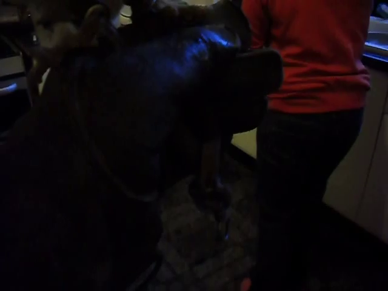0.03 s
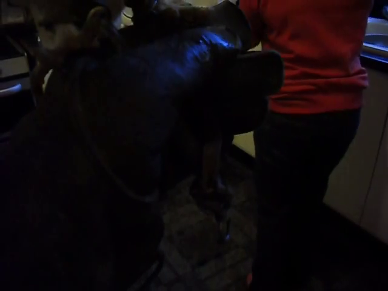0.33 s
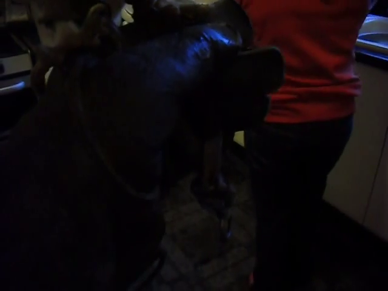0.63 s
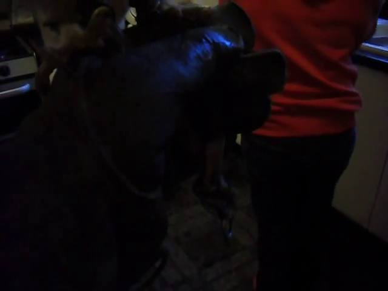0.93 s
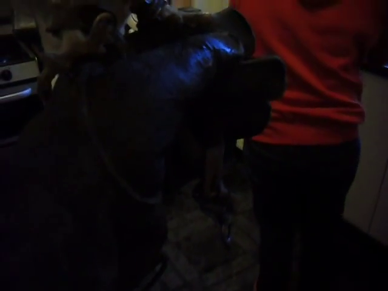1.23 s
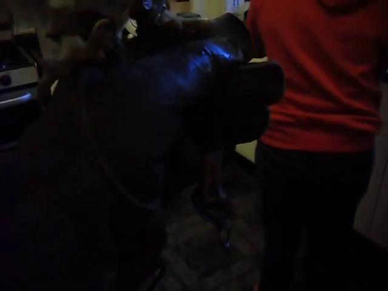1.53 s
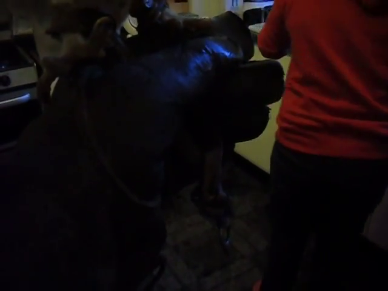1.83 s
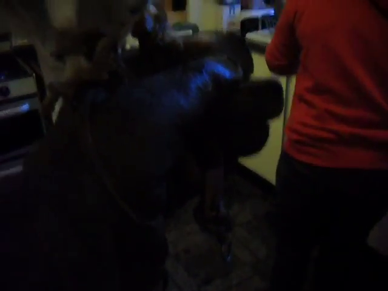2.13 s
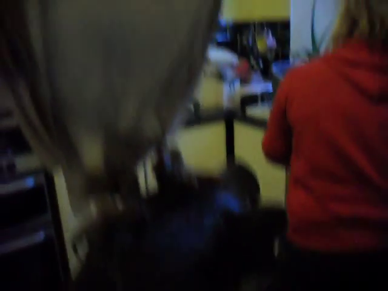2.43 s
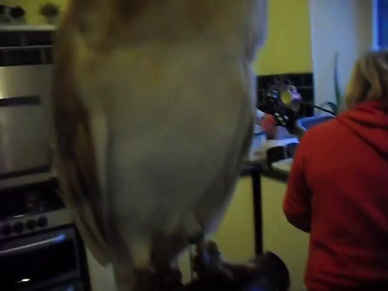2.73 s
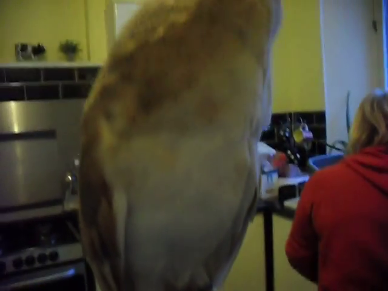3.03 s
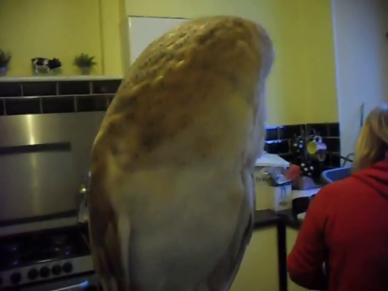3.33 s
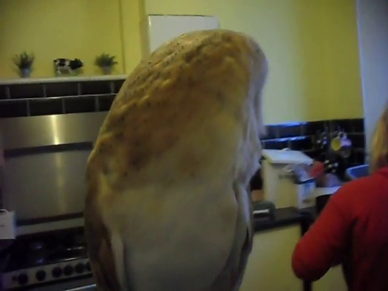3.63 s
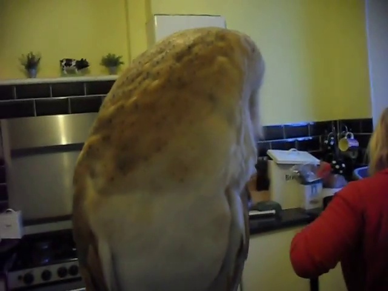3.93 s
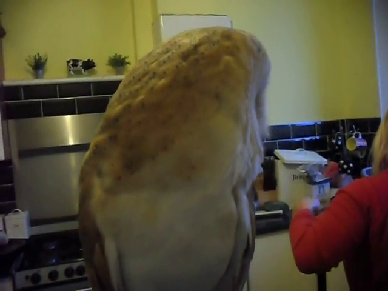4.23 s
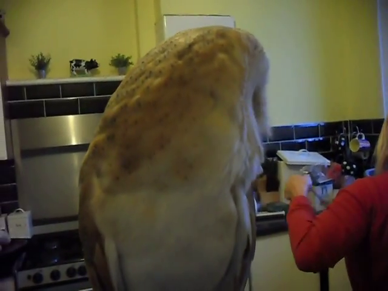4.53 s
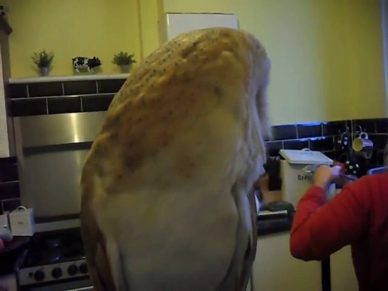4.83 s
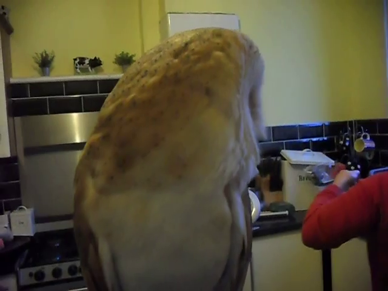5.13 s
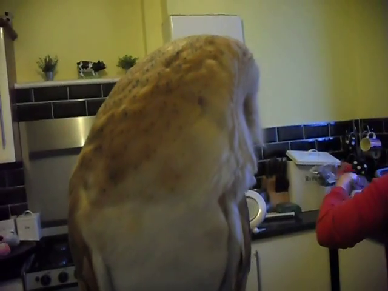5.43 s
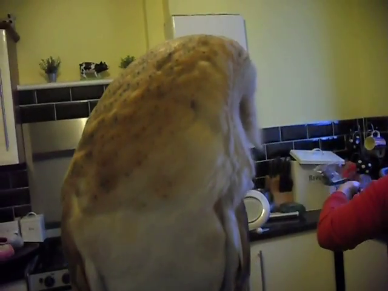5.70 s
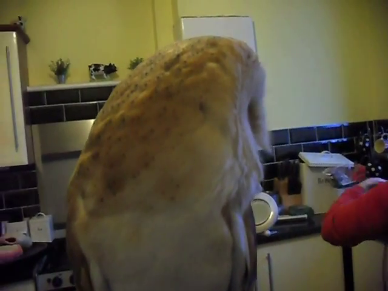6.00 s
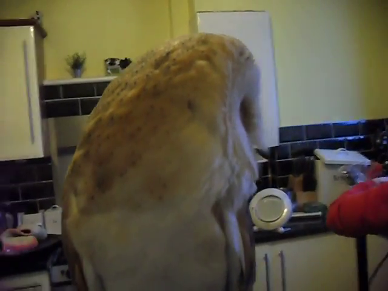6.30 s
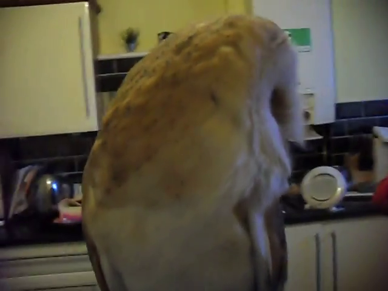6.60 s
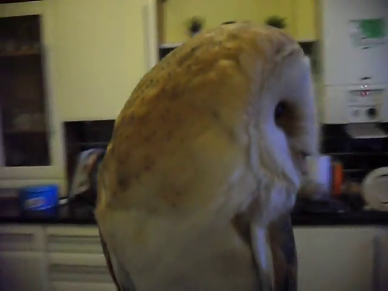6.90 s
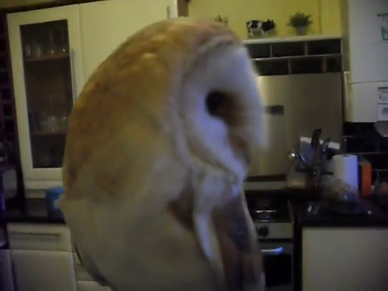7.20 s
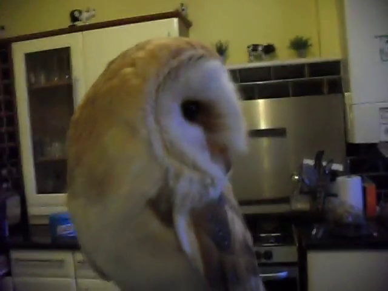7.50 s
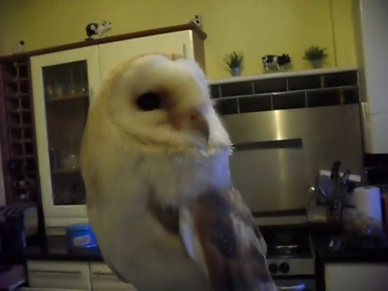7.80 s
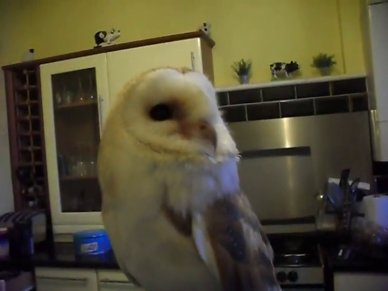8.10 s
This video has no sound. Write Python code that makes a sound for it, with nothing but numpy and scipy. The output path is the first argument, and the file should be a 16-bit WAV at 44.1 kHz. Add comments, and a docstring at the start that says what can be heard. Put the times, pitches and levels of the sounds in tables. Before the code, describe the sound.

A low hum and steady hiss fill a quiet kitchen, with faint brushing of sleeves and feathers. A soft knock at the counter is followed by one sharp, close click. Then a barn owl near the microphone gives a pair of short, squeaky chirps with tiny pips, and does so again a moment later. A few more dull knocks follow. The chirps and knocks ring briefly in the tiled room.

```python
"""A low hum and steady hiss fill a quiet kitchen. Sleeves and feathers brush, and someone knocks
softly at the counter now and then. At 2.1 s a hard contact gives one sharp, close click.
Near 4 s and again near 5.6 s a barn owl close by gives a pair of squeaky chirps among short pips
and squeaks: its syrinx slides and breaks in pitch, and its windpipe and beak colour the voice.
The soft work goes on to the end. Owl and chores ring briefly in the tiled room."""
import sys
import numpy as np
from scipy import signal
from scipy.fft import rfft, irfft, next_fast_len
from scipy.io import wavfile
from scipy.ndimage import uniform_filter1d

SR = 44100
rng = np.random.default_rng(int(sys.argv[2]) if len(sys.argv) > 2 else 0)


def master_out(mix):
    """Clip the mix to full scale and print it as 16-bit PCM to the path in sys.argv[1]."""
    frames = np.transpose(np.atleast_2d(mix))
    ceiling = np.clip(frames, -1, 1)
    pcm = np.round(ceiling * 32767).astype(np.int16)
    wavfile.write(sys.argv[1], SR, pcm)


N = 359415
T = np.arange(N) / SR


def undb(db):
    """Decibels to gain."""
    return 10 ** (np.asarray(db) / 20)


def unit_rms(x):
    """Scale to rms 1."""
    return x / np.sqrt(np.mean(x ** 2) + 1e-18)


def add(out, time_s, x):
    """Mix x into out from time_s."""
    i = int(time_s * SR)
    out[i:i + len(x)] += x[:len(out) - i]


def decay(t, t60_s):
    """Exponential fall, 60 dB in t60_s."""
    return undb(-60 * t / t60_s)


def resonance(f, centre_hz, width_hz):
    """Gain of one resonance at frequencies f."""
    return 1 / np.sqrt(1 + ((f ** 2 - centre_hz ** 2) / (f * width_hz + 1e-9)) ** 2)


def colour(f, points):
    """Gain of a (frequency [Hz], level [dB]) curve at frequencies f."""
    hz, db = np.transpose(points)
    return undb(np.interp(np.log(f + 1e-9), np.log(hz), db))


def noise(size, gain):
    """Noise of rms 1 with spectrum gain(f)."""
    n_fft = next_fast_len(size)
    f = np.arange(n_fft // 2 + 1) * SR / n_fft
    spectrum = rfft(rng.standard_normal(n_fft)) * gain(f)
    return unit_rms(irfft(spectrum, n_fft)[:size])


def waver(size, hz):
    """Random motion of rms 1, up to about hz."""
    return noise(size, lambda f: 1 / (1 + (f / hz) ** 4))


# hum tones: (frequency [Hz], level [dB])
HUM_TONES = [(30.3, -55.5), (60, -65.5)]

def hum(drift_rad=0.416, drift_hz=4.2, flutter=0.17, flutter_hz=19.0):
    """Low tones, slightly unsteady in phase and level."""
    tones = np.zeros(N)
    for hz, db in HUM_TONES:
        phase = 2 * np.pi * hz * T + drift_rad * waver(N, drift_hz)
        tones += undb(db) * np.sqrt(2) * np.sin(phase)
    return tones * (1 + flutter * waver(N, flutter_hz))


# hiss spectrum: (frequency [Hz], relative density [dB])
HISS_SPECTRUM = [(12, -10.5), (20, 1), (38, -6.5), (55, -9.5), (75, -11.5), (196, -17), (269, -17.5),
                 (307, -18.5), (390, -20), (470, -22), (551, -22.5), (1250, -26.5), (2080, -28.5),
                 (9930, -34.5), (11300, -36), (14700, -79), (22000, -120)]

def hiss(level_db=-53.5):
    """Steady broadband noise, strongest in the bass."""
    return undb(level_db) * noise(N, lambda f: colour(f, HISS_SPECTRUM))


# brush strokes: (centre time [s], length [s], level [dB], centre [Hz], width [Hz])
BRUSH_STROKES = [(0.35, 0.118, -60, 388, 150), (1.091, 0.48, -59, 416, 294), (2.333, 0.574, -62, 786, 1200),
                 (3.579, 0.98, -62.5, 1480, 2420), (7.203, 1.35, -63, 1700, 3600),
                 (7.5, 1.3, -70.5, 1560, 450)]

def brushing(grain_db=0.5, grain_hz=45):
    """Sleeves and feathers rub: soft, grainy swells of band noise."""
    out = np.zeros(N)
    for centre_s, length_s, db, centre_hz, width_hz in BRUSH_STROKES:
        size = int(length_s * SR)
        friction = noise(size, lambda f: resonance(f, centre_hz, width_hz) ** 2)
        grain = undb(grain_db * waver(size, grain_hz))
        stroke = unit_rms(friction * grain) * np.hanning(size)
        add(out, max(centre_s - length_s / 2, 0), undb(db) * stroke)
    return out


# counter knocks: (time [s], level [dB], low-pass cutoff [Hz])
COUNTER_KNOCKS = [(1.492, -43.5, 1350), (3.736, -46, 1410), (5.277, -48, 1400), (5.306, -47.5, 1400),
                  (5.392, -54.5, 2000), (6.285, -50.5, 1200), (6.383, -49.5, 1100), (6.603, -50, 1400),
                  (6.873, -49, 3420), (6.934, -49, 1500), (7.751, -50.5, 1710)]

def knocks(highpass_hz=150, attack_s=0.00257, t60_s=0.0694):
    """Soft impacts at the counter: dull, fast-decaying noise bursts."""
    out, t = np.zeros(N), T[:SR // 3]
    envelope = np.minimum(t / attack_s, 1) * decay(t, t60_s)
    for time_s, db, top_hz in COUNTER_KNOCKS:
        thud = noise(len(t), lambda f: f / np.hypot(f, highpass_hz) / (1 + (f / top_hz) ** 7))
        add(out, time_s, undb(db) * thud * envelope)
    return out


# modes rung by the click: (frequency [Hz], level [dB], t60 [s])
CONTACT_MODES = [(748, -17.5, 0.0167), (1014, -30, 0.0894), (1125, -28, 0.047), (1805, -47.5, 0.069),
                 (1930, -19.5, 0.0165), (2179, -21.5, 0.0151), (2665, -28.5, 0.0107), (3230, -26, 0.0105),
                 (4380, -29, 0.0051), (6490, -26.5, 0.0079), (7950, -39.5, 0.011)]

def click(time_s=2.1393, push_db=-8.5, pulse_s=0.001238, rebound=0.84,
          crack_db=-25, crack_t60_s=0.0079, crack_hz=2500):
    """A close, hard contact: one push and rebound, a crack and a short ring."""
    out, t = np.zeros(N), T[:SR // 5]
    pulse = -np.sin(2 * np.pi * t / pulse_s) * (t < pulse_s)
    pulse[t >= pulse_s / 2] *= rebound
    ring = sum(undb(db) * decay(t, t60_s) * np.sin(2 * np.pi * hz * t)
               for hz, db, t60_s in CONTACT_MODES)
    crack = noise(len(t), lambda f: 1 / np.hypot(1, f / crack_hz)) * decay(t, crack_t60_s)
    add(out, time_s, undb(push_db) * pulse)
    add(out, time_s + pulse_s / 2, ring + undb(crack_db) * crack)
    return out


def hold_fade_db(size, hold_share=0.55, fade_db=5):
    """Level contour of a short call: hold, then fade."""
    return np.interp(np.linspace(0, 1, size), [hold_share, 1], [0, -fade_db])


# owl pips: (time [s], length [s], start pitch [Hz], end pitch [Hz], level [dB])
OWL_PIPS = [(3.989, 0.0078, 2080, 1146, -40), (4.354, 0.00516, 2105, 1490, -46.5),
            (4.367, 0.0138, 1392, 2220, -55.5), (5.822, 0.0171, 1519, 1901, -43.5),
            (5.833, 0.011, 2190, 2590, -47), (5.863, 0.0217, 2226, 1586, -55)]

def pips(jitter=0.08, jitter_hz=400, octave_db=-22):
    """At low pressure the syrinx swings gently: short, nearly pure sliding whistles."""
    out = np.zeros(N)
    for time_s, length_s, start_hz, end_hz, db in OWL_PIPS:
        size = int(length_s * SR)
        hz = np.linspace(start_hz, end_hz, size) * (1 + jitter * waver(size, jitter_hz))
        phase = 2 * np.pi * np.cumsum(hz) / SR
        whistle = np.sqrt(2) * (np.sin(phase) + undb(octave_db) * np.sin(2 * phase))
        envelope = undb(db + hold_fade_db(size)) * signal.windows.tukey(size, 0.2)
        add(out, time_s, whistle * envelope)
    return out


# windpipe and beak resonances: (centre [Hz], width [Hz], gain [dB])
THROAT_RESONANCES = [(1562, 1340, 0.5), (3153, 1600, 2.5), (4424, 428, 8), (5370, 440, -9), (7180, 960, -4),
                     (8138, 1353, 7), (10150, 440, -8)]

def throat(f):
    """Gain of the owl's windpipe and beak: resonances summed in power."""
    return np.sqrt(sum((undb(db) * resonance(f, hz, width_hz) ** 2) ** 2
                       for hz, width_hz, db in THROAT_RESONANCES))


def brightening_db(hz, db_per_oct=13.5, push_db=3.5, push_oct_per_s=4.7, smooth_s=0.0042):
    """The voice brightens with pitch, and while the owl pushes the pitch up."""
    rise_oct_per_s = uniform_filter1d(np.gradient(np.log2(hz)) * SR, int(smooth_s * SR))
    return db_per_oct * np.log2(hz / hz.mean()) + push_db * np.tanh(rise_oct_per_s / push_oct_per_s)


def syrinx(hz, db, odd_db, bright_db, rough, slope_db_per_oct=0, jitter=0.0484, shimmer=0.127,
           settle_s=0.0033, edge_s=0.00063, shelf_hz=5600, leak_db=-26, rasp_db=-5, rasp_leak_db=-20):
    """The owl's voice; when its half cycles match, odd harmonics fade and it squeaks an octave up."""
    t = T[:len(hz)]
    # rougher as the swing starts and stops; roughness scatters pitch and strength
    rough = rough + 0.1 * np.exp(-t / settle_s) + 0.39 * np.exp((t - t[-1]) / settle_s)
    phase = 2 * np.pi * np.cumsum(hz * (1 + jitter * rough * waver(len(t), hz=770))) / SR
    strength = 1 + shimmer * rough * waver(len(t), hz=650)
    k = np.arange(1, 9)[:, None]
    shelf_db = (bright_db + brightening_db(hz)) / (1 + (shelf_hz / (k * hz)) ** 7)
    source_db = odd_db * (k % 2) + shelf_db + slope_db_per_oct * np.log2(np.minimum(k, 3))
    gain = undb(source_db) * (throat(k * hz) + undb(leak_db)) * (k * hz < SR / 3)
    harmonics = np.sin(k * phase + rng.uniform(0, 2 * np.pi, k.shape))
    voice = np.sqrt(2) * np.sum(gain * harmonics, axis=0) / np.linalg.norm(gain, axis=0)
    # air rasps through the beak once a cycle
    air = noise(len(t), lambda f: (throat(f) + undb(rasp_leak_db)) * np.sqrt(f))
    rasp = undb(rasp_db) * rough * air * (1 + np.cos(phase))
    gate = np.clip(np.minimum(t, t[-1] - t) / edge_s, 0, 1)
    return (voice * strength + rasp) * undb(db) * gate


# chirp slides, the last two joined in one chirp; points: (time [s], pitch [Hz], relative level [dB])
CHIRP_SLIDES = [
    [(4.008, 1605, -37.5), (4.012, 1893, -34), (4.02, 1727, -30), (4.028, 1746, -36.5),
     (4.034, 1485, -37.5), (4.041, 1108, -43.5)],
    [(4.197, 1996, -26), (4.209, 2377, -28.5), (4.221, 2147, -26.5), (4.229, 2266, -23),
     (4.233, 2800, -31.5), (4.243, 1799, -29.5), (4.251, 1405, -32.5), (4.263, 1414, -35.5),
     (4.277, 1232, -43.5), (4.294, 1215, -46)],
    [(5.555, 1776, -35.5), (5.561, 1849, -32), (5.565, 1793, -32), (5.571, 1450, -32.5),
     (5.575, 1417, -29.5), (5.579, 1505, -33.5), (5.592, 1128, -50.5)],
    [(5.69, 2003, -36.5), (5.696, 2387, -44.5), (5.704, 2134, -32.5), (5.712, 1832, -32), (5.72, 2049, -26),
     (5.729, 2339, -33)],
    [(5.73, 3558, -22), (5.736, 3414, -33.5), (5.748, 2498, -33.5), (5.76, 2159, -28), (5.776, 1957, -33.5),
     (5.806, 1336, -43.5), (5.829, 1712, -49)],
]
# voice per slide: (break time [s], odd harmonics before [dB], odd harmonics after [dB],
# brightness [dB], slope of harmonics 1-3 after [dB/oct], roughness [ratio])
CHIRP_VOICES = [(4.032, -5, -8.5, -5, -5, 0.33), (4.230, -7, -0.5, -0.5, -6.5, 0.29),
                (5.569, 8.5, 7, 3.5, 2, 0.52), (5.71, -38.5, -1.5, 3.5, 1.5, 0.31),
                (5.744, -39.5, -16, -5.5, -3.5, 0.6)]

def chirps(gain_db=-1.45, overhang_s=0.00175, break_s=0.003, break_rough=0.288, rough_ramp=0.61):
    """Each slide of the syrinx coarsens as it goes and breaks once: a rasp, a new harmonic balance."""
    out = np.zeros(N)
    for slide, voice in zip(CHIRP_SLIDES, CHIRP_VOICES):
        times_s, pitches_hz, levels_db = np.transpose(slide)
        break_at_s, odd_before_db, odd_after_db, bright_db, slope_db_per_oct, base_rough = voice
        t = np.arange(times_s[0], times_s[-1] + overhang_s, 1 / SR)
        hz = np.interp(t, times_s, pitches_hz)
        db = np.interp(t, times_s, levels_db) + gain_db
        broken = (1 + np.tanh((t - break_at_s) / break_s)) / 2
        rough = base_rough * np.linspace(1 - rough_ramp, 1 + rough_ramp, len(t))
        rough += break_rough * np.sin(np.pi * broken)
        odd_db = odd_before_db + (odd_after_db - odd_before_db) * broken
        add(out, times_s[0], syrinx(hz, db, odd_db, bright_db, rough, slope_db_per_oct * broken))
    return out


# owl squeaks: (time [s], length [s], start pitch [Hz], middle pitch [Hz], end pitch [Hz],
# level [dB], odd harmonics [dB], brightness [dB], roughness [ratio])
OWL_SQUEAKS = [(4.059, 0.01597, 1473, 1379, 1284, -38, -12, -12, 0.31),
               (4.297, .013, 1835, 1546, 1282, -38, -0.5, -4, 0.48),
               (5.545, 0.0145, 2344, 2172, 2300, -42.5, -23, 4, 0.25),
               (5.581, .025, 1955, 2168, 2628, -40, -15.5, 7, 1.06)]

def squeaks():
    """Short calls of the syrinx, each with one pitch bend."""
    out = np.zeros(N)
    for time_s, length_s, *pitches_hz, db, odd_db, bright_db, rough in OWL_SQUEAKS:
        size = int(length_s * SR)
        bend = np.polyfit([0, 0.5, 1], pitches_hz, 2)
        hz = np.polyval(bend, np.linspace(0, 1, size))
        add(out, time_s, syrinx(hz, db + hold_fade_db(size), odd_db, bright_db, rough))
    return out


# spectrum of the tiled room's ring: (frequency [Hz], relative level [dB])
ROOM_SPECTRUM = [(300, -11.5), (1500, -7), (3000, -5), (4400, -4), (5800, 3), (8000, -2.5), (11000, -3.5)]

def kitchen(x, early_db=-16, early_t60_s=0.186, ring_db=-12, ring_t60_s=0.433, predelay_s=0.005):
    """Direct sound, quick reflections from near surfaces and the room's short, bright ring."""
    t = T[:SR // 2]
    response = np.zeros(len(t))
    for db, t60_s in ((early_db, early_t60_s), (ring_db, ring_t60_s)):
        tail = noise(len(t), lambda f: colour(f, ROOM_SPECTRUM)) * decay(t, t60_s)
        response += undb(db) * tail / np.linalg.norm(tail)
    out = x.copy()
    add(out, predelay_s, signal.fftconvolve(x, response)[:N])
    return out


def scene():
    """Mono mix: chores and owl through the room; hum, hiss and click direct."""
    chores = brushing() + knocks()
    owl = pips() + chirps() + squeaks()
    return (hum() + hiss() + click() + kitchen(chores + owl))[None]


def record(dry, cutoff_hz=10650):
    """Steep low-pass."""
    lowpass = signal.firwin(105, cutoff_hz, window=("kaiser", 8), fs=SR)
    return signal.fftconvolve(dry, lowpass[None], mode="same")


dry = scene()
out = record(dry)
master_out(out)
```